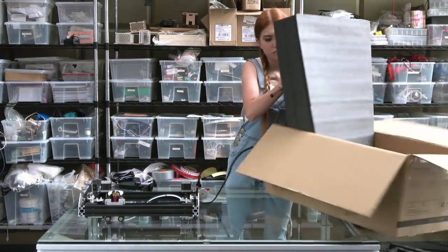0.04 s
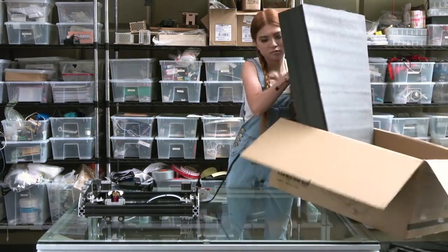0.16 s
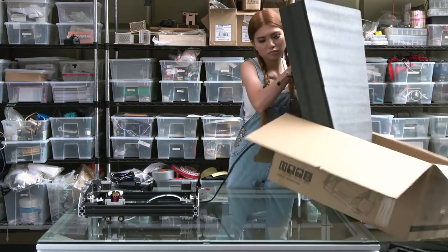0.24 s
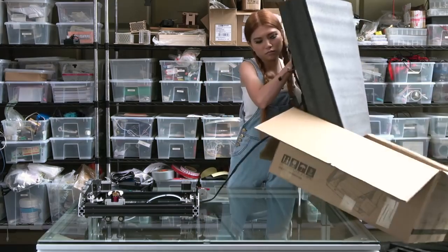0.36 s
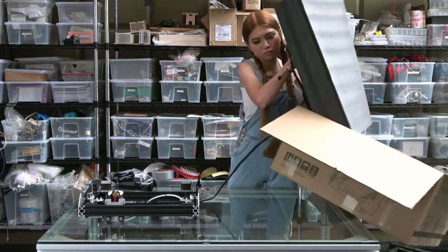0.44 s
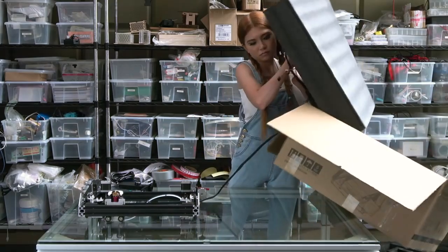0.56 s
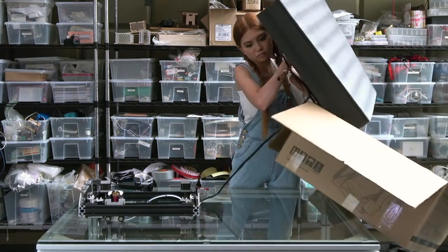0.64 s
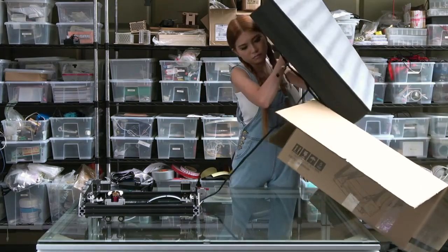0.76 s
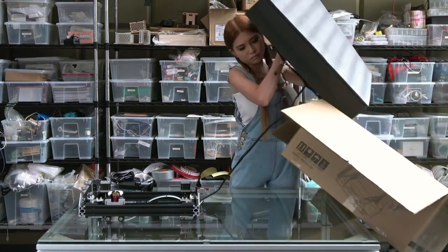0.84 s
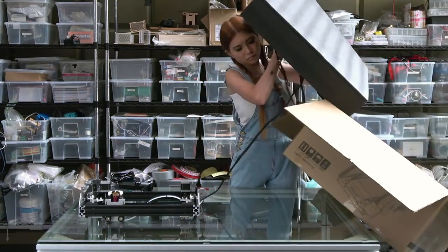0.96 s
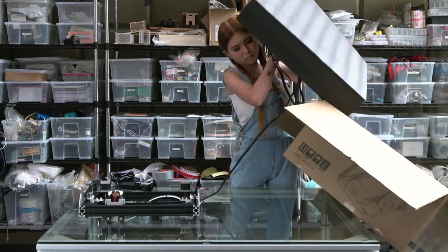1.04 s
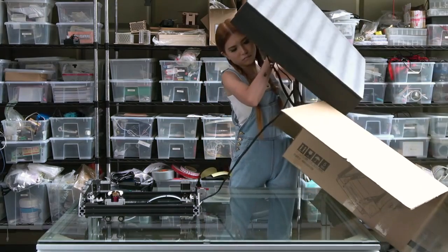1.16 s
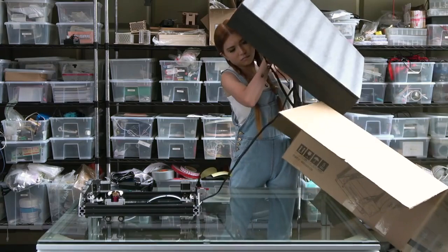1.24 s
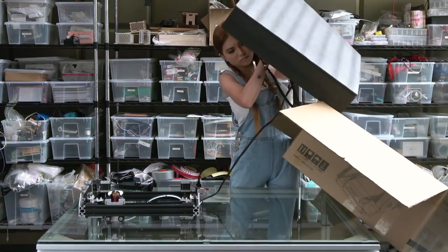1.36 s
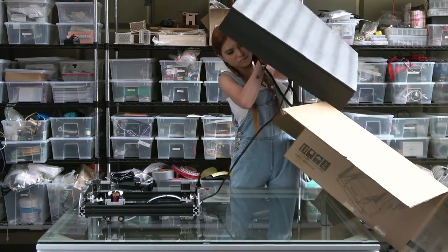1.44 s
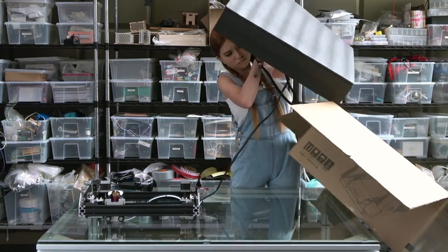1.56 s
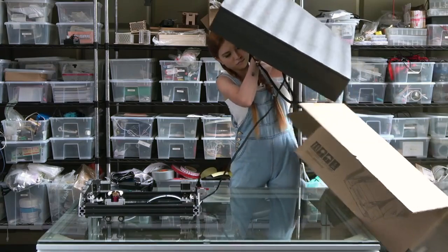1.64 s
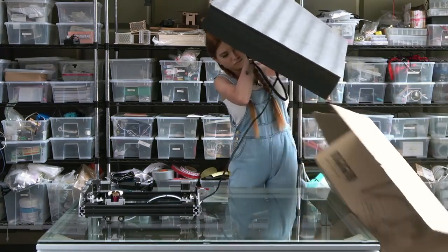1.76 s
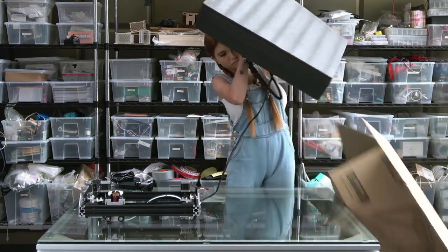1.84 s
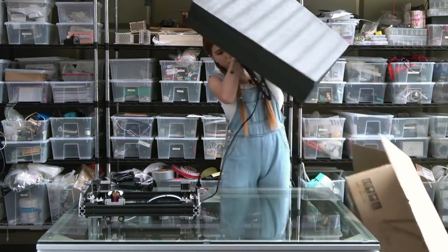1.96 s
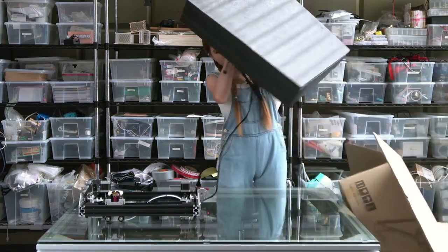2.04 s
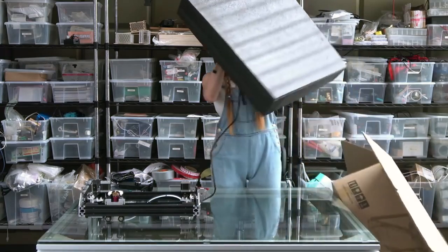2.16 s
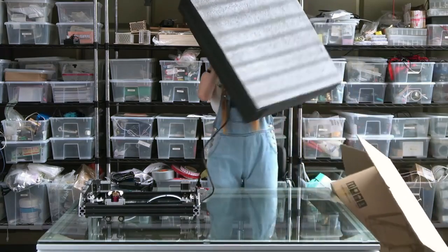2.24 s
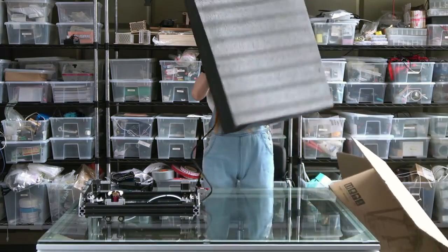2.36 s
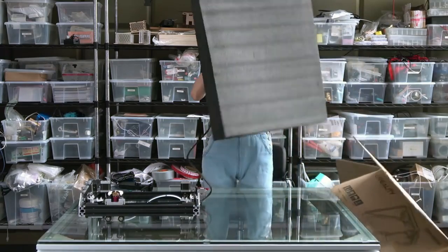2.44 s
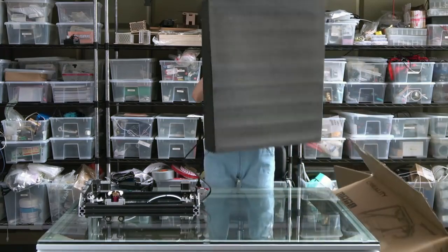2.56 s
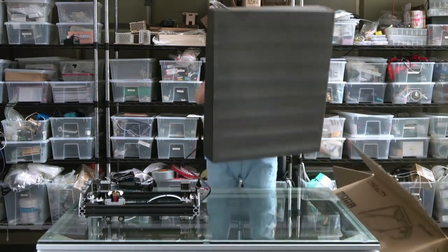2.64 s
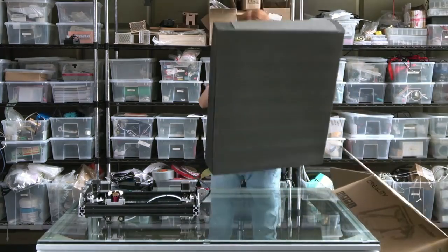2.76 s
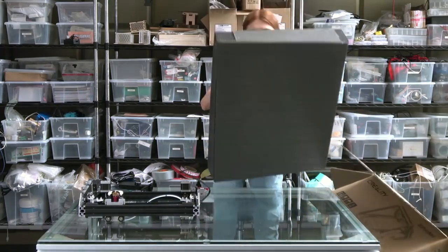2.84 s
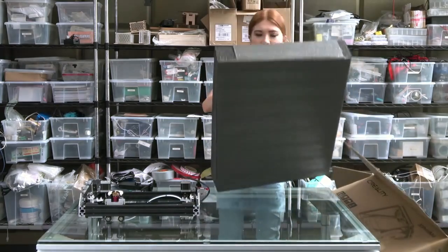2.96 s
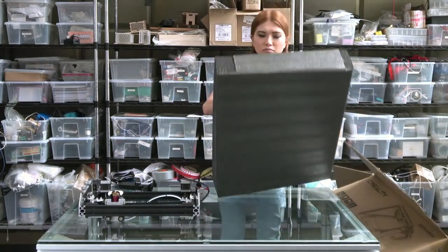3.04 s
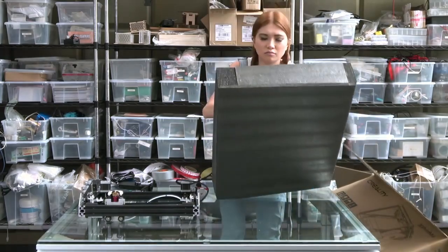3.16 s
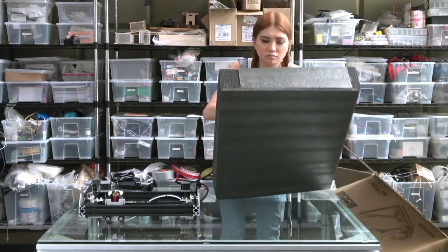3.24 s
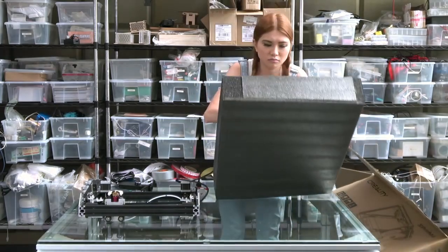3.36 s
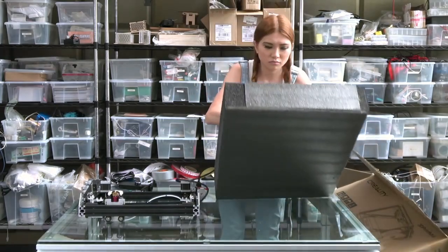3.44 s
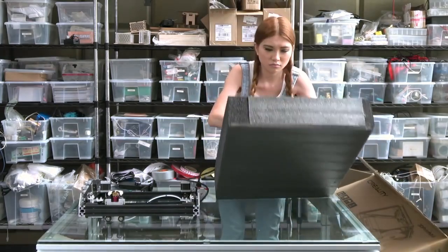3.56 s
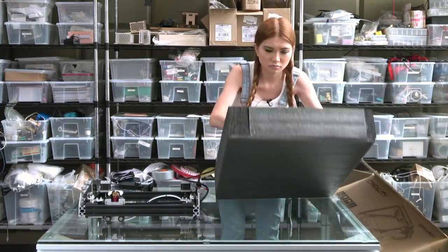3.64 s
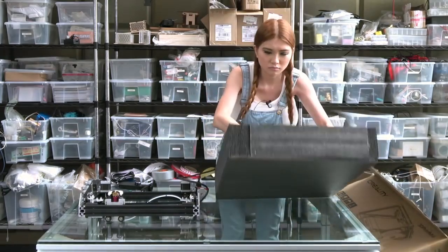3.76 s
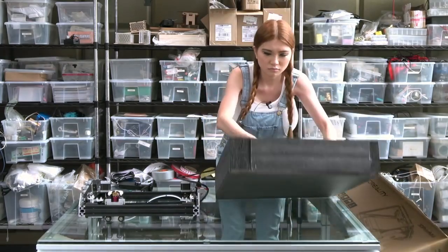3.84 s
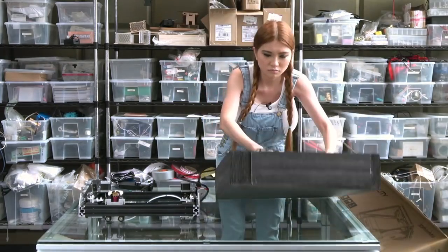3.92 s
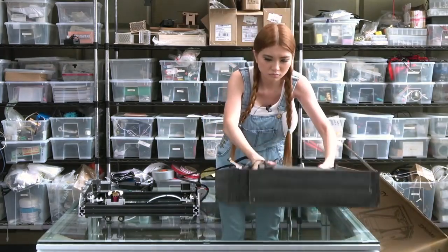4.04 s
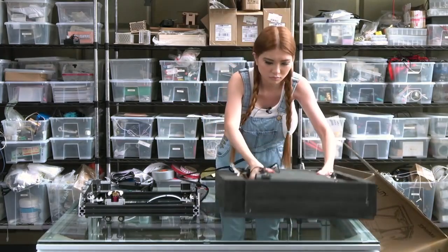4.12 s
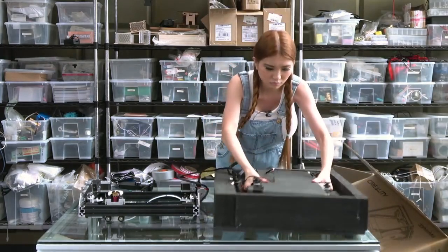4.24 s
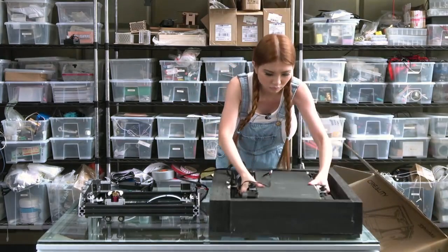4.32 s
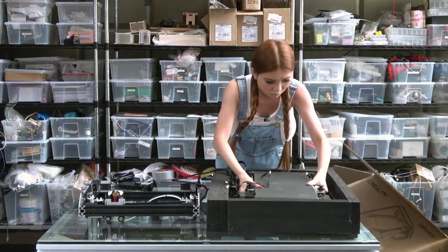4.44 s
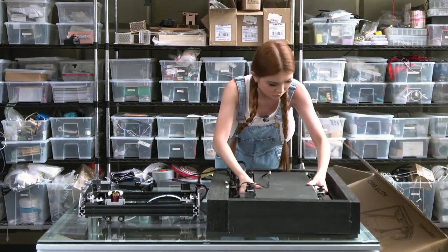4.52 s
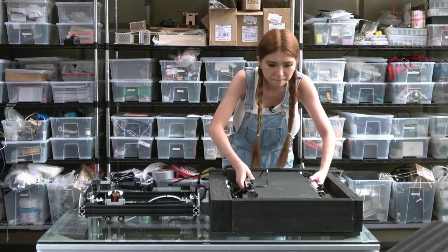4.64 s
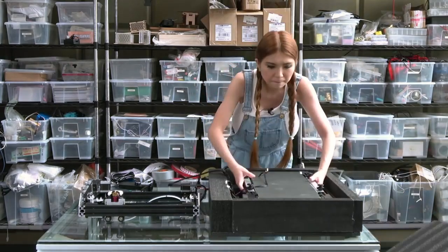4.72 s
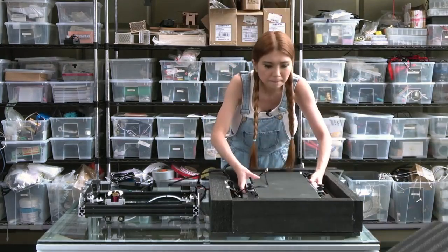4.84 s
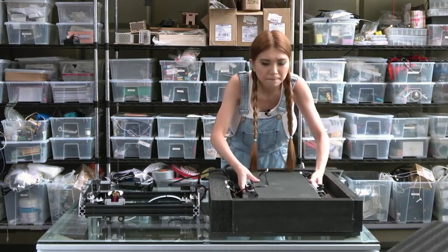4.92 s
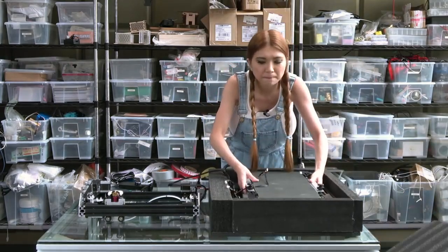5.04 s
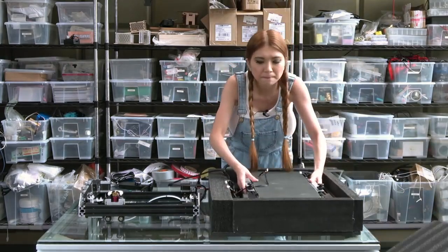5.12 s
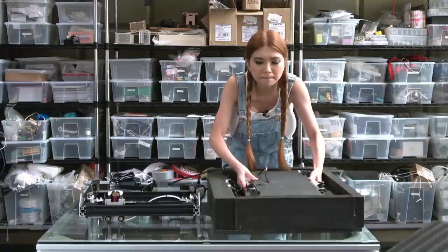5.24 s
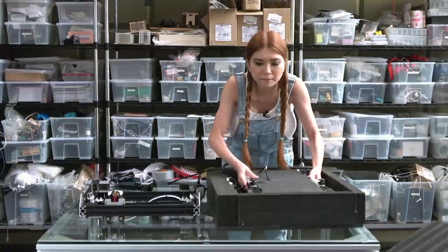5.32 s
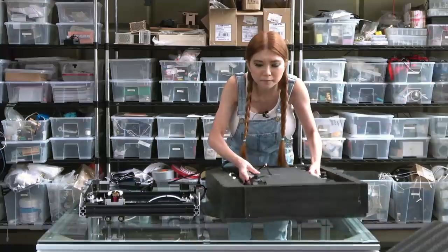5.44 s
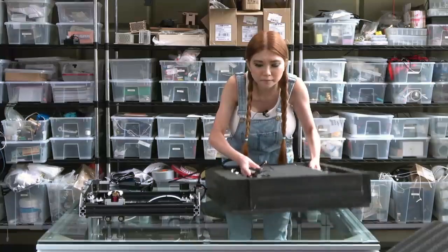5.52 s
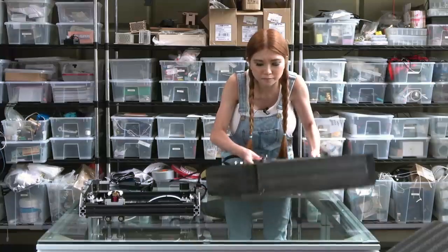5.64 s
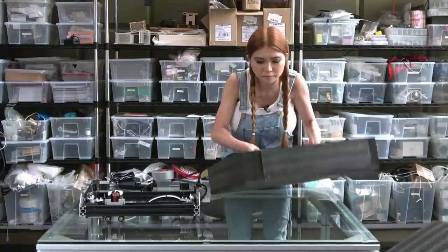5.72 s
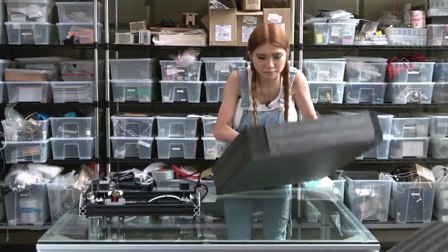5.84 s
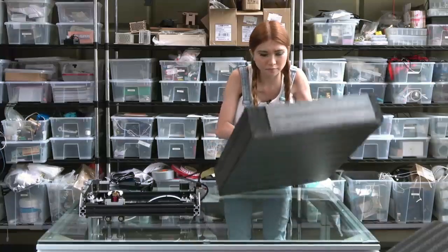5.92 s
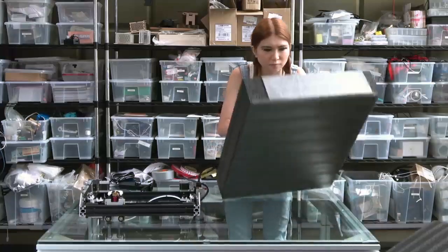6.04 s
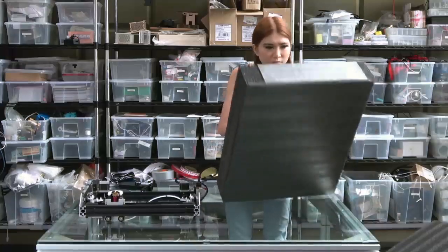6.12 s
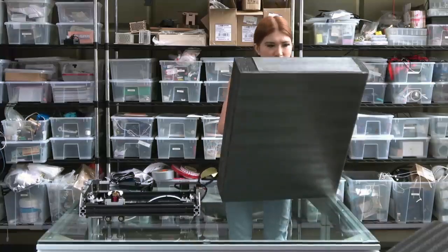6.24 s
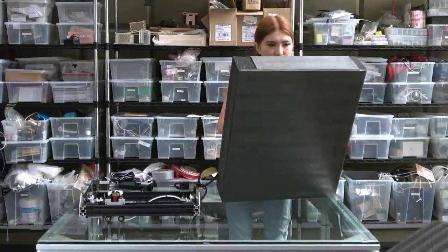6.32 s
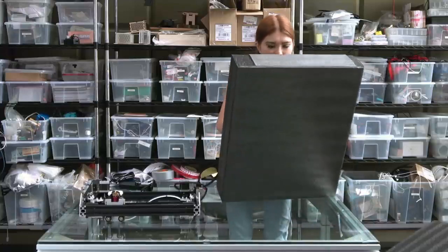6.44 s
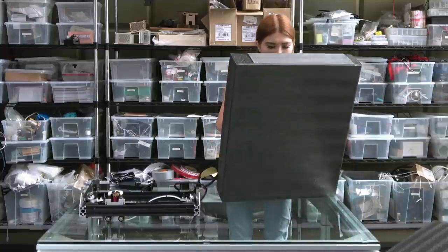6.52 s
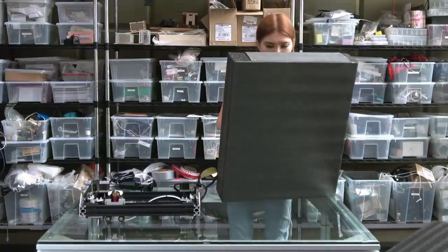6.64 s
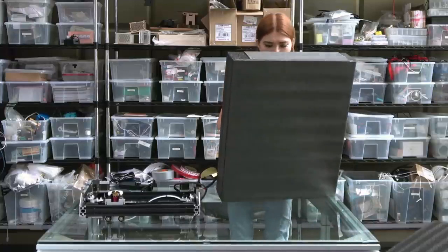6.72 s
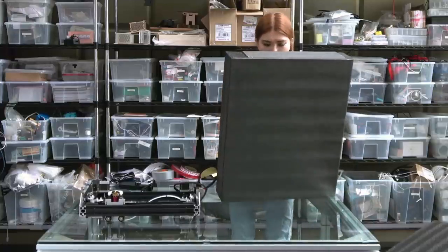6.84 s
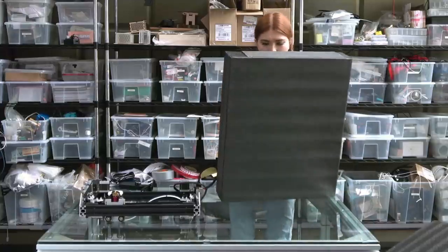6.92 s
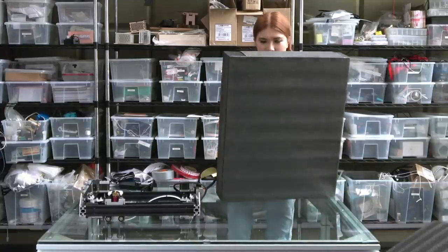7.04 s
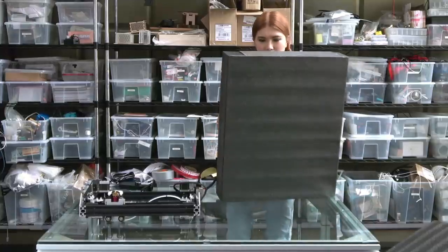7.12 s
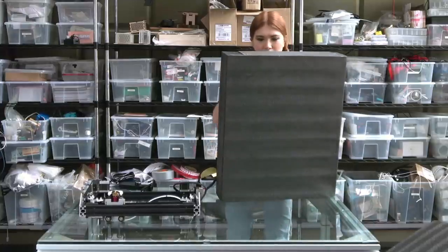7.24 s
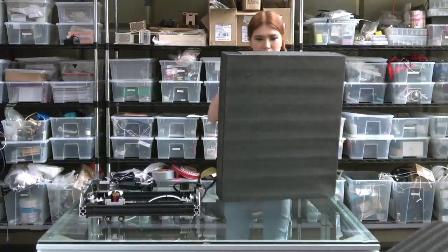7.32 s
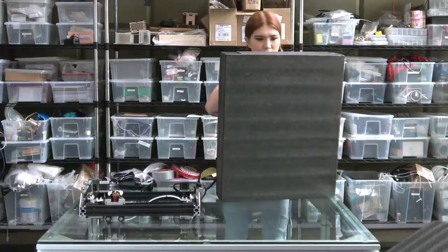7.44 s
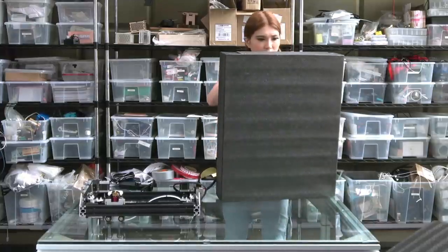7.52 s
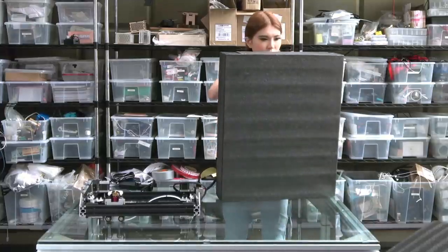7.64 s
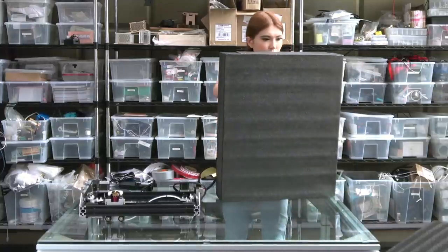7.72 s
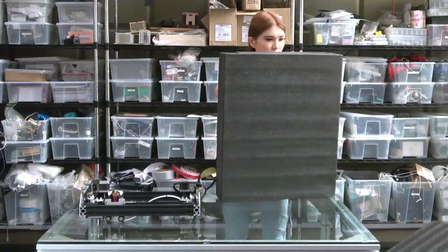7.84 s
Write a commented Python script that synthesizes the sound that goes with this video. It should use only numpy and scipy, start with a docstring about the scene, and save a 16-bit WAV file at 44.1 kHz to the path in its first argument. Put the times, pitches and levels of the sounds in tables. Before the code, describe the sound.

Cardboard panels bump and rumble as foam packing slides out with a rough, hissing scrape, and the emptied box lands with a low boom. Next comes a run of sharp foam squeaks, creaks and snaps, then quieter sliding, a knock and some last scuffs as the block is moved on a table. Everything is close to the microphone, in a slightly echoing workshop with a faint low rush of air.

```python
"""Unboxing a foam-packed item

A large item is pulled from a cardboard box close by in a workshop, set on a table and stood up again.
Sliding friction makes the cardboard scrape and the foam hiss; blows excite damped panel vibrations,
and the empty box drops and booms in its own modes. Under the hands the foam sticks and slips:
single slips snap, and rapid trains of them fuse into creaks and squeaks."""
import sys
import numpy as np
from scipy import signal
from scipy.io import wavfile
from scipy.ndimage import uniform_filter1d

SR = 44100
rng = np.random.default_rng(int(sys.argv[2]) if len(sys.argv) > 2 else 0)


def unload_wav(signal):
    """Save mono or channel-first audio to the path in sys.argv[1] as 16-bit WAV at rate SR, clipped to [-1, 1]."""
    wavfile.write(
        sys.argv[1],
        SR,
        np.round(np.clip(np.atleast_2d(signal).T, -1, 1) * 32767).astype(np.int16),
    )


N = 347488
TIME = np.arange(N) / SR

# Spectra of the noises and impacts: f/Hz, relative level/dB
AIR_SPECTRUM = [(15, -27), (28, 15), (123, 12), (430, 7), (2050, -20), (16000, -54)]
RUMBLE_SPECTRUM = [(15, -16), (30, -1), (100, 3), (150, 0.5), (230, -12), (1000, -61)]
SCRAPE_SPECTRUM = [(80, -26.5), (220, 4.5), (500, 0), (950, -3.5), (2200, -16), (4000, -23), (16000, -41)]
HISS_SPECTRUM = [(400, -13), (1500, 1.5), (3600, 2.5), (7000, 1.5), (9500, -7), (16000, -6)]
SLAP_SPECTRUM = [(40, -12.5), (150, 8), (450, 7.5), (1100, -9), (4000, -27), (16000, -35)]
SNAP_SPECTRUM = [(600, -25), (1900, -4.5), (3300, 0), (4000, 3), (4900, 0), (6800, -13), (8500, -18),
                 (16000, -26)]
# Reverberation time of the workshop: f/Hz, T60/s
ROOM_DECAY = [(100, 1.2), (1200, 1.5), (15000, 0.4)]
# Spectrum of its tail: f/Hz, relative level/dB
ROOM_SPECTRUM = [(60, -16.5), (1000, -10.5), (3500, -14.5), (16000, -16)]

# Friction of hands that are never quite still: rumble/dB, scrape/dB, hiss/dB
HOLDING_LEVELS = (-48.5, -48.5, -59)
# Loads that flex the panels: t/s, rise/s, rumble/dB, settling/(dB/s)
PANEL_LOADS = [(0.095, 0.04, -17, 23), (.68, 0.066, -24, 14.5), (1.129, 0.025, -23.5, 92),
               (2.03, 0.05, -18.5, 26), (4.72, 0.1, -35.5, 6), (5.98, 0.16, -36, 60),
               (7.62, 0.014, -25, 67)]
# Packing sliding over cardboard, hands and table: t/s, rise/s, fall/s, scrape/dB, hiss/dB
SLIDING_STROKES = [(0, 0.092, 0.017, -29, -28.5), (0.103, 0.048, 0.22, -16, -64),
                   (.26, 0.13, 0.51, -28, -45), (.67, 0.13, 0.37, -35, -39), (.93, 0.11, 0.054, -26, -35.5),
                   (1.126, 0.085, 0.019, -29.5, -42.5), (1.336, 0.13, 0.041, -34.5, -42),
                   (1.496, 0.252, 0.014, -23, -30.5), (1.789, 0.092, 0.12, -25.5, -33.5),
                   (2.02, 0.016, 0.34, -28, -43), (2.56, 0.13, 0.14, -35, -54.5),
                   (4.29, 0.082, 0.079, -44, -44.5), (4.619, 0.04, 0.18, -29, -62),
                   (4.81, 0.072, 0.27, -34.5, -41), (5.151, 0.37, 0.17, -29, -47),
                   (5.7, 0.16, 0.18, -34, -47.5), (6.07, 0.21, 0.27, -31, -47),
                   (7.619, 0.012, 0.11, -26.5, -32.5), (7.801, 0.054, 0.068, -27, -36.5)]
# Resonances in the hiss of sliding foam: f/Hz, bandwidth/Hz, relative level/dB
HISS_RESONANCES = [(3260, 250, -10), (9400, 900, -9)]
# Foam skidding without grip: t/s, rise/s, fall/s, level/dB
FOAM_SKIDS = [(.11, 0.047, 0.071, -31), (4.47, 0.031, 0.012, -26), (5.28, 0.14, 0.23, -44),
              (5.76, 0.11, 0.092, -46.5), (7.24, 0.057, 0.016, -43), (7.515, .01, .03, -49)]

# Taps and scuffs of edges, fingers and flaps: t/s, energy/dB, f/Hz, T60/s
LIGHT_TAPS = [(.636, 13.5, 924, 0.03), (.636, 1, 2420, 0.029), (1.5137, -4, 4430, 0.0063),
              (1.753, 5, 1030, 0.09), (2.691, -9.5, 4340, 0.006), (4.677, 3, 478, 0.06),
              (4.763, -4.5, 5500, 0.025), (4.78, -5, 3670, 0.016), (5.203, 1.5, 446, 0.05),
              (5.204, -7, 1320, 0.02), (5.2299, -6, 1290, 0.0066), (6.2714, 6.5, 2180, 0.015),
              (7.477, -6.5, 530, 0.052), (7.632, -0.5, 3100, 0.12), (7.7986, 3, 1510, 0.25)]
# Dull blows on the panels: t/s, flex energy/dB, flex f/Hz, slap energy/dB, slap T60/s
PANEL_BLOWS = [(0.039, 16, 96, 11.5, 0.052), (0.108, 18, 242, 20, 0.04), (.178, 19, 129, 11.5, 0.22),
               (0.214, 17.5, 123, 12.5, 0.22), (0.253, 17, 110, -12, 0.089), (0.983, 18.5, 138, 7.5, 0.068),
               (1.003, 18.5, 142, 0, 0.2), (1.135, 4, 155, -4, 0.033), (2.023, 9, 285, 17.5, 0.36),
               (2.275, 10.5, 139, 9, 0.14), (6.271, 7.5, 300, 15.5, 0.033), (7.617, 6, 68, 5, 0.16),
               (7.851, 14, 48, -18, 0.063)]
# The empty box lands and rocks: t/s, energy/dB
BOX_LANDINGS = [(2.033, 25), (2.119, 21)]
# Modes of the box (air and panels) and of the foam block: f/Hz, relative level/dB, T60/s
BOX_MODES = [(70.43, -3.5, 1.0), (154.5, -9.5, 0.78), (273, -8.5, 0.39)]
FOAM_MODES = [(122, -11, 0.077), (305, 1.5, 0.051), (428, 4, 0.05), (756, 2.5, 0.022), (846, 6.5, 0.054),
              (1170, 8.5, 0.017), (1392, 6.5, 0.017)]

# Single slips of the foam, and knocks of its corner on the table that share their sound: t/s, body energy/dB,
# snap energy/dB
SINGLE_SLIPS = [(3.242, 15, 6), (3.449, 13.5, 10), (3.4713, 12, 7.5), (4.033, 10.5, 10.5), (4.057, 7, 7.5),
                (4.101, -20, -12), (4.1488, 3.5, 0), (4.4176, 11, 9.5), (4.6142, -2, -1.5),
                (4.691, -8, 1.5), (6.2715, -16, 2), (7.4769, -24, -5)]
# Slip rate in running stick-slip, one curve a squeak: t/s, f/Hz
GROAN = [(3.264, 750), (3.284, 715), (3.309, 680), (3.317, 340), (3.338, 184)]
SQUEAL = [(3.476, 524), (3.502, 842), (3.517, 1176), (3.54, 1204), (3.553, 1567), (3.57, 1149), (3.59, 900),
          (3.61, 585), (3.636, 223)]
RATCHET = [(4.0668, 111.2), (4.083, 361.6), (4.108, 264.3), (4.137, 128)]
SQUEAK = [(4.423, 610), (4.436, 1197), (4.44, 1746), (4.45, 1760), (4.467, 1610)]
CREAK = [(4.622, 186.7), (4.657, 281), (4.67, 205.2), (4.681, 145)]
# Squeaks: rate curve, body/dB, snap/dB, pressure arch/dB, top of the arch/duration, snap f/Hz,
# upper resonance f/Hz, jitter/period, unevenness/dB.
# Body and snap are the energy of one slip at USUAL_SLIP_HZ and full pressure.
SLIP_TRAINS = [(GROAN, 4.5, 0, 9, 0.62, 4600, 6600, 0.07, 1.8),
               (SQUEAL, 4.2, -0.3, 3.1, 0.8, 4200, 7000, 0.028, 2.4),
               (RATCHET, 1.5, -2.5, 3.5, 0.3, 4100, 8500, 0.08, 2),
               (SQUEAK, -1, 4.4, 6.2, 0.65, 3330, 5200, 0.0075, 1),
               (CREAK, -10, -2.5, 1.8, 0.87, 3150, 4100, 0.012, 1.2)]

SWELL_DB, GRIP_S = 11, 0.015  # swell of a movement; time to make or lose contact
USUAL_SLIP_HZ, STICK_DB = 500, 1.5  # a slip gains STICK_DB for each doubling of the time stuck
PATCH_HZ, PATCH_WIDTH_HZ, PATCH_DRIFT = 817, 1120, 0.15  # contact resonance; drift as a fraction


def amp(db):
    """Amplitude ratio of a level in decibels."""
    return 10 ** (np.asarray(db) / 20)


def unit(x):
    """Normalisation to unit energy."""
    return x / np.sqrt(np.sum(x ** 2) + 1e-20)


def read(points, hz):
    """Interpolation on a logarithmic frequency axis."""
    f, value = np.transpose(points)
    return np.interp(np.log(hz + 1), np.log(f + 1), value)


def add(mix, start, sound):
    """Superposition of a sound on the mix, from start in seconds."""
    part = mix[max(round(start * SR), 0):][:len(sound)]
    part += sound[:len(part)]


def through(x, response):
    """Convolution with an impulse response."""
    return signal.oaconvolve(x, response)[:len(x)]


def colour(spectrum, shift=1, size=4096):
    """Minimum-phase response of unit energy, its spectrum scaled in frequency by shift."""
    hz = abs(np.fft.fftfreq(size, 1 / SR))
    log_gain = np.log(amp(read(spectrum, hz / shift)))
    transfer = np.exp(np.conj(signal.hilbert(log_gain)))
    return unit(np.fft.ifft(transfer).real[:size // 2])


def ring(modes, size=SR):
    """Free vibration: a sum of damped modes, of unit total energy."""
    t = np.arange(size) / SR
    return unit(sum(amp(db - 60 * t / t60) * np.sin(2 * np.pi * hz * t) for hz, db, t60 in modes))


def resonate(x, hz, width_hz):
    """Forced vibration, of unit energy, of a resonator whose centre follows the curve hz."""
    carrier = np.exp(2j * np.pi * np.cumsum(hz) / SR)
    pole = np.exp(-np.pi * width_hz / SR)
    return unit((carrier * signal.lfilter([1], [1, -pole], x / carrier)).real)


def burst(t60, size=12000):
    """White noise in exponential decay."""
    return rng.standard_normal(size) * amp(-60 * np.arange(size) / SR / t60)


def wander(per_s):
    """Slow random fluctuation of unit variance."""
    knots = np.arange(0, N / SR + 1, 1 / per_s)
    return np.interp(TIME, knots, rng.standard_normal(len(knots))) * np.sqrt(3 / 2)


def air_noise():
    """Stationary low noise of the workshop air."""
    return amp(-43) * through(rng.standard_normal(N), colour(AIR_SPECTRUM))


def reverberation(x, build_s=0.0027):
    """Dense reflections off table and shelves merge into a diffuse tail that loses its treble first."""
    hz, t, tail = signal.stft(rng.standard_normal(SR), SR, nperseg=256)
    t60 = read(ROOM_DECAY, hz)[:, None]
    tail *= amp(read(ROOM_SPECTRUM, hz)[:, None] - 60 * t / t60)
    tail *= np.sqrt(2 * np.log(1000) / (t60 * SR))  # a longer decay carries no more energy
    early = 1 + 0.52 * np.exp(-t / 0.13)  # the nearest surfaces answer most strongly
    onset = np.minimum(t / build_s, 1)
    return through(x, signal.istft(tail * early * onset, SR, nperseg=256)[1])


def friction(spectrum, grains_per_s, grain_share, spread_db, judder_db, judder_per_s, patchy_db=1.4):
    """Sliding friction: fibres catch in random clicks over smooth noise, and the whole judders."""
    catches = (rng.random(N) < grains_per_s / SR) * rng.choice([-1, 1], N)
    clicks = catches * amp(spread_db * np.minimum(rng.exponential(1, N), 4))
    slide = rng.standard_normal(N)
    drive = np.sqrt(grain_share) * unit(clicks) + np.sqrt(1 - grain_share) * unit(slide)
    bands = signal.stft(drive * amp(judder_db * wander(judder_per_s)), nperseg=512)[2]
    # the colour shifts as the contact travels over the panel
    patches = uniform_filter1d(rng.standard_normal(bands.shape), size=4, axis=0)
    patches = uniform_filter1d(patches, size=10, axis=1)
    drive = signal.istft(bands * amp(patchy_db * patches / patches.std()), nperseg=512)[1][:N]
    return np.sqrt(N) * unit(through(drive, colour(spectrum)))


def stroke_gain(start, rise, fall):
    """Friction noise follows speed: the surfaces meet, accelerate, slow down and part."""
    peak, end = start + rise, start + rise + fall
    contact = np.interp(TIME, [start - GRIP_S, start, end, end + GRIP_S], [0, 1, 1, 0])
    return contact * amp(np.interp(TIME, [start, peak, end], [-SWELL_DB, 0, -SWELL_DB]))


def load_gain(start, rise, settle_db_per_s):
    """Relaxation: the load on a panel builds up, then settles exponentially."""
    swell_db = np.interp(TIME, [start, start + rise], [-SWELL_DB, 0])
    settled_db = settle_db_per_s * np.maximum(TIME - start - rise, 0)
    return np.clip((TIME - start) / GRIP_S, 0, 1) * amp(swell_db - settled_db)


def foam_hiss(drift=0.033):
    """Friction of foam on cardboard: a grainy hiss with wandering resonances."""
    hiss = unit(friction(HISS_SPECTRUM, grains_per_s=400, grain_share=0.35, spread_db=1.5,
                         judder_db=1.2, judder_per_s=70, patchy_db=3.0))
    peaks = sum(amp(db) * resonate(hiss, hz * (1 + drift * wander(15)), width_hz)
                for hz, width_hz, db in HISS_RESONANCES)
    return np.sqrt(N) * unit(hiss + peaks)


def rubbing():
    """Panels rumble, cardboard scrapes and foam hisses; being incoherent, movements add in power."""
    rumble_power, scrape_power, hiss_power = amp(HOLDING_LEVELS) ** 2
    for start, rise, db, settle_db_per_s in PANEL_LOADS:
        rumble_power += (amp(db) * load_gain(start, rise, settle_db_per_s)) ** 2
    for start, rise, fall, scrape_db, hiss_db in SLIDING_STROKES:
        gain = stroke_gain(start, rise, fall)
        scrape_power += (amp(scrape_db) * gain) ** 2
        hiss_power += (amp(hiss_db) * gain) ** 2
    rumble = friction(RUMBLE_SPECTRUM, grains_per_s=56, grain_share=0.073, spread_db=-0.5,
                      judder_db=1.5, judder_per_s=21)
    scrape = friction(SCRAPE_SPECTRUM, grains_per_s=600, grain_share=0.28, spread_db=2.5,
                      judder_db=1.53, judder_per_s=56)
    return (np.sqrt(rumble_power) * rumble + np.sqrt(scrape_power) * scrape
            + np.sqrt(hiss_power) * foam_hiss())


def skids(shift=0.79):
    """Sliding without grip: countless tiny snaps blur into a rasp, lower in colour than a full slip."""
    power = sum((amp(db) * stroke_gain(start, rise, fall)) ** 2 for start, rise, fall, db in FOAM_SKIDS)
    spectrum = [(shift * hz, db) for hz, db in SNAP_SPECTRUM]
    return np.sqrt(power) * friction(spectrum, grains_per_s=1300, grain_share=0.42, spread_db=2.5,
                                     judder_db=0, judder_per_s=60)


def taps(quality=5.2):
    """Transient excitation: each light contact drives one broad resonance with a burst of noise."""
    out = np.zeros(N)
    for start, db, hz, t60 in LIGHT_TAPS:
        resonance = signal.iirpeak(hz, quality, fs=SR)
        add(out, start, amp(db) * unit(signal.lfilter(*resonance, burst(t60))))
    return out


def thumps(flex_cycles=9):
    """Impact excitation: a blow flexes a panel and slaps its face; the dropped box booms in its modes."""
    out = np.zeros(N)
    for start, flex_db, flex_hz, slap_db, slap_t60 in PANEL_BLOWS:
        add(out, start, -amp(flex_db) * ring([(flex_hz, 0, flex_cycles / flex_hz)]))
        add(out, start, amp(slap_db) * unit(through(burst(slap_t60), colour(SLAP_SPECTRUM))))
    for start, db in BOX_LANDINGS:
        add(out, start, amp(db) * ring(BOX_MODES))
    return out


def foam_body():
    """Impulse response of the foam block: damped modes and a brief crush of its cells."""
    crush = unit(through(burst(t60=0.065), colour(SLAP_SPECTRUM, shift=2.46)))
    return unit(ring(FOAM_MODES, size=12000) + 0.86 * crush)


def foam_snap(drive, peak_hz):
    """Response of the contact to sudden release: a bright spectrum with its peak at peak_hz."""
    return unit(through(drive, colour(SNAP_SPECTRUM, shift=peak_hz / 4000)))


def slips(scatter=0.86):
    """Single events of the foam: it lets go and grips again, or its corner knocks on the table, each time at a
    different spot."""
    out = np.zeros(N)
    spots = rng.uniform(-0.33, 1, len(SINGLE_SLIPS))
    for (start, body_db, snap_db), spot in zip(SINGLE_SLIPS, spots):
        body = foam_body()
        release = scatter * unit(burst(t60=0.014))  # scattering inside the foam
        release[0] += 1  # the impulse of letting go
        snap = foam_snap(release, peak_hz=3800 * (1 + 0.019 * spot))
        add(out, start, amp(body_db) * body + amp(snap_db) * snap)
    return out


def squeak(curve, body_db, snap_db, arch_db, top, snap_hz, upper_hz, jitter, uneven_db):
    """Relaxation oscillation: repeated slips fuse into a pitch. Returns start time and sound."""
    knots, rate = np.transpose(curve)
    t = np.arange(knots[0], knots[-1], 1 / SR)
    slip_hz = np.interp(t, knots, rate) * (1 + 0.025 * wander(260)[:len(t)])
    cycles = np.cumsum(slip_hz) / SR
    slip_times = np.interp(np.arange(cycles[-1]), cycles, t)
    lateness, strength = rng.standard_normal((len(slip_times), 2)).T
    period = 1 / np.interp(slip_times, t, slip_hz)
    # the hand presses and eases in one arch; the longer the foam sticks, the harder it lets go
    progress = (slip_times - knots[0]) / (knots[-1] - knots[0])
    pressure_db = -arch_db * np.interp(progress, [0, top, 1], [-1, 0, 1]) ** 2
    force = amp(pressure_db + STICK_DB * np.log2(period * USUAL_SLIP_HZ) + uneven_db * strength)
    span = knots[0] + np.arange(-64, len(t) + SR // 8) / SR
    onsets = slip_times + jitter * period * lateness
    pulses = unit(force @ np.sinc((span - onsets[:, None]) * SR))
    # each slip drags over the cell walls for about a millisecond
    drag = through(pulses, np.exp(-np.arange(200) / 35)) * rng.standard_normal(len(span))
    drive = pulses + 0.2 * unit(drag)
    # the contact patch resonates higher as it slides faster, and drifts as it is squeezed
    drift = 1 + PATCH_DRIFT * wander(50)[:len(span)]
    patch_hz = PATCH_HZ * drift * np.sqrt(np.interp(span, knots, rate) / USUAL_SLIP_HZ)
    body = unit(through(drive, foam_body()))
    body = body + resonate(body, patch_hz, PATCH_WIDTH_HZ / 2)
    radiation = signal.butter(2, 80, "high", fs=SR)  # a steady push makes no sound
    body = unit(signal.lfilter(*radiation, body))
    snap = foam_snap(drive, snap_hz)
    upper = resonate(np.gradient(snap), upper_hz * drift, PATCH_WIDTH_HZ)
    snap = unit(snap + 0.5 * resonate(snap, snap_hz * drift, PATCH_WIDTH_HZ) + 0.23 * upper)
    return span[0], np.linalg.norm(force) * (amp(body_db) * body + amp(snap_db) * snap)


def scene():
    """Superposition of direct sound, reverberation and air noise; the sliding stays almost dry."""
    events = slips() + thumps() + taps()
    for train in SLIP_TRAINS:
        add(events, *squeak(*train))
    sliding = rubbing() + skids()
    air = air_noise()
    direct = events + amp(0.08) * sliding
    return (direct + reverberation(events + amp(-50) * sliding) + air)[None]


def record(dry):
    """Hard clipping of the loudest peaks, then a low-pass band limit."""
    lowpass = signal.firwin(511, cutoff=16050, window=("kaiser", 9), fs=SR)
    return signal.oaconvolve(np.clip(dry, -1, 1), lowpass[None], "same")


dry = scene()
out = record(dry)
unload_wav(out)
```